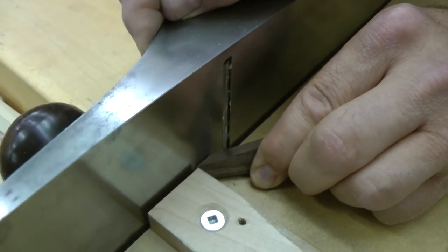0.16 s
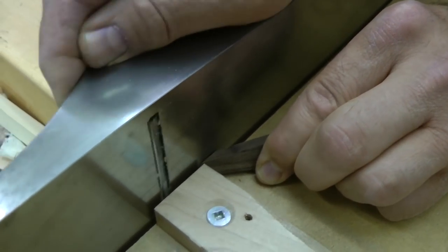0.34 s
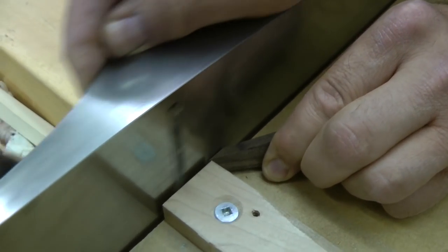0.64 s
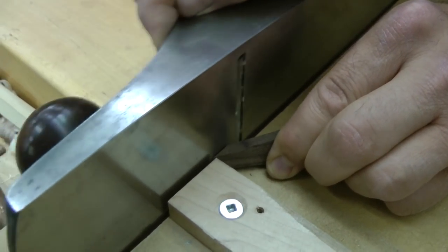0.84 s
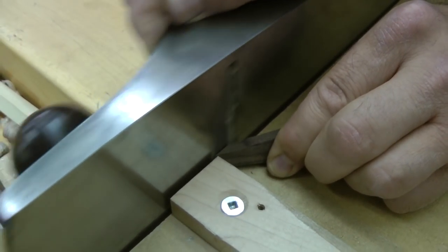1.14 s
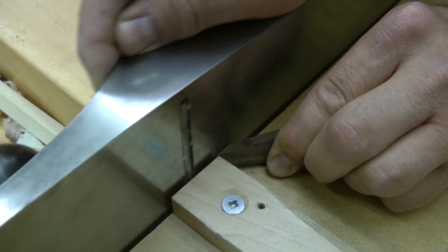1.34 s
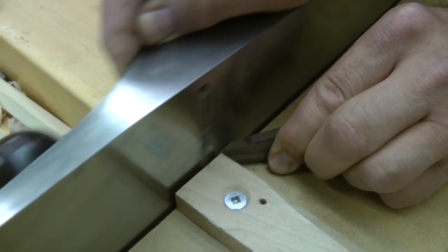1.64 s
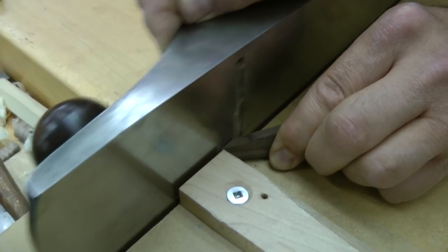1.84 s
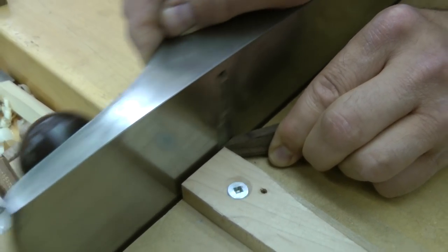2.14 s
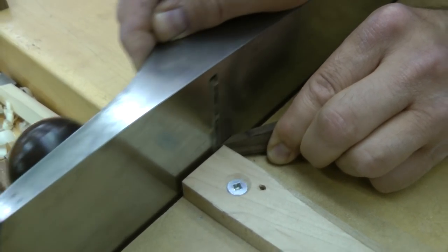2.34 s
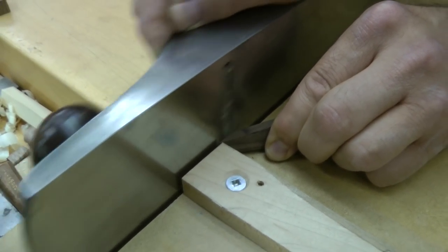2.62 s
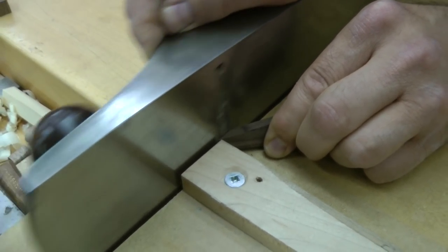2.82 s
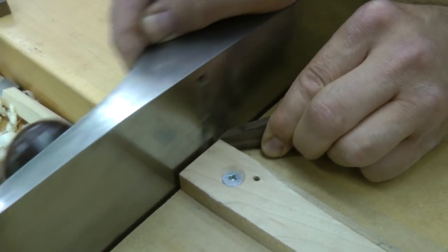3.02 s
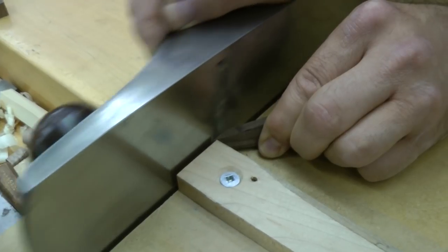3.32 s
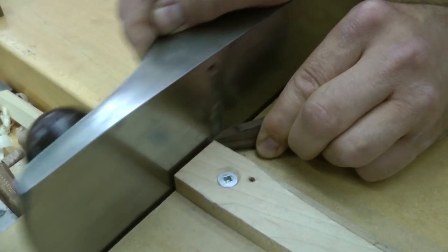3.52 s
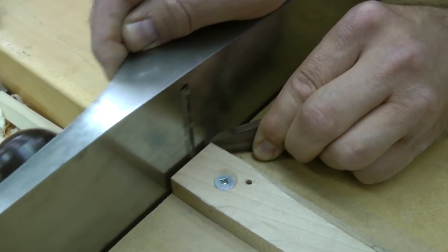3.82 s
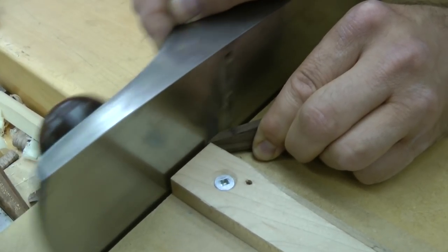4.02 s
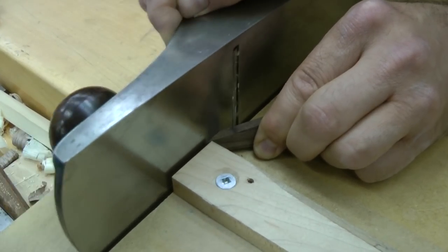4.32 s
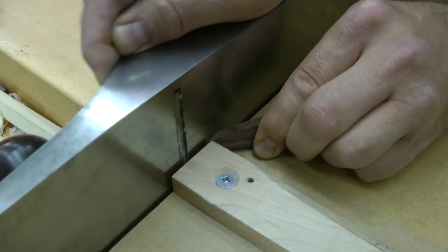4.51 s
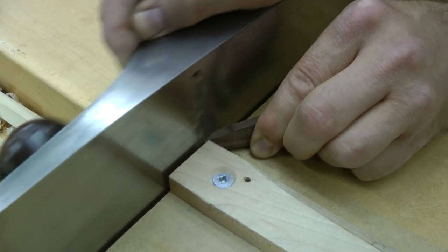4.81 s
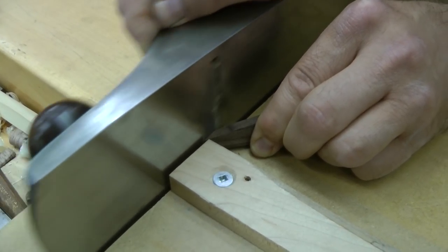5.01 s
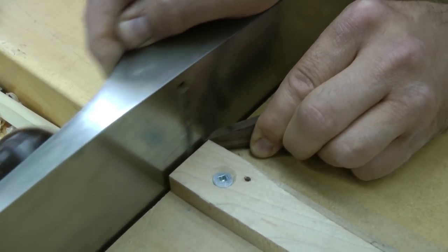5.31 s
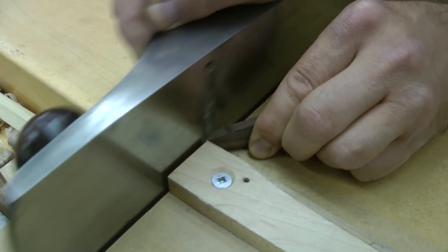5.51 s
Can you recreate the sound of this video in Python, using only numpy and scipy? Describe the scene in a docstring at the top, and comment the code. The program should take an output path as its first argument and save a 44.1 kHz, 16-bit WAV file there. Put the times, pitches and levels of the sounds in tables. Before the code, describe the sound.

A metal hand plane shuttles rapidly on a wooden board, each forward stroke giving a crisp short rasp of cut wood, with soft knocks at the turns.

```python
"""In a small, dry workshop a metal hand plane shuttles on a wooden shooting board, nearly three strokes a second.
Going forward, the blade fractures wood fibres: shaped noise gives the hiss, and drives modes of iron and board;
the board thumps as the blade comes free. The sliding side rubs with a friction noise that follows its speed.
Each turn knocks softly, a push ringing the body's modes; going back, the blade brushes the wood and slips off.
The sound is close and is followed by a short, dull tail, over faint room noise."""
import sys
import numpy as np
from scipy import signal
from scipy.fft import rfft, irfft
from scipy.io import wavfile
from scipy.ndimage import uniform_filter1d

SR = 44100
rng = np.random.default_rng(int(sys.argv[2]) if len(sys.argv) > 2 else 0)


def wav_out(sig):
    """Save sig, one row per channel (or a flat mono array), as 16-bit PCM at SR to the path in sys.argv[1]."""
    wavfile.write(sys.argv[1], SR, np.round(np.clip(np.atleast_2d(sig).T, -1, 1) * 32767).astype(np.int16))


N = 249385
T = np.arange(N) / SR


def amp(db):
    """Level law: decibels to an amplitude ratio."""
    return 10 ** (np.asarray(db) / 20)


def noise():
    """White noise: equal power at every frequency."""
    return rng.standard_normal(N)


def butter_filter(x, order, hz, kind="low"):
    """Linear filtering: a Butterworth filter along time."""
    return signal.sosfilt(signal.butter(order, hz, kind, fs=SR, output="sos"), x)


def through(x, response):
    """Convolution: a linear body answers a force with its impulse response."""
    return signal.oaconvolve(x, response)[:len(x)]


def unit(response):
    """Energy normalisation: white noise passes at its own level."""
    return response / np.sqrt(np.sum(response ** 2))


def add(track, start_s, sound):
    """Superposition: mix a sound into a track at a given time."""
    i = int(start_s * SR)
    sound = sound[max(-i, 0):N - i]
    track[max(i, 0):max(i, 0) + len(sound)] += sound


def along(curve, s):
    """Linear interpolation: the values of a control curve at given times."""
    times, *columns = np.transpose(curve)
    return [np.interp(s, times, column) for column in columns]


def colour(points, size=4096):
    """Minimum phase: a causal response with a given spectrum, falling away below its first point."""
    hz, db = np.transpose(points)
    f = np.arange(size // 2 + 1) * SR / size + 1
    low_fall = np.clip(f / hz[0], 1 / 10, 1) ** 2
    gain = amp(np.interp(np.log(f), np.log(hz), db)) * low_fall
    # folding the cepstrum on to positive times makes the response causal
    cepstrum = irfft(np.log(gain))[:size // 2]
    return unit(irfft(np.exp(2 * rfft(cepstrum, size))))


def ringing(modes, size=6000):
    """Modal superposition: damped modes of a body that radiates little outside their range."""
    t = T[:size]
    ring = np.zeros(size)
    for hz, width_hz, db in modes:
        decay = np.exp(-np.pi * width_hz * t)
        # the factor of width makes the level that of the spectral peak
        ring += amp(db) * width_hz * decay * np.cos(2 * np.pi * hz * t)
    ring = butter_filter(ring, 4, modes[0][0] * 0.95, "high")
    return unit(butter_filter(ring, 8, modes[-1][0] * 1.012))


def grit(rate, spread_db, flicker_rate, flicker_db, size=400):
    """Random impulses: clustered uneven fractures, divided by their local rms to hold an even level."""
    happens = rng.random(N) < rate / SR  # rate in fractures per second
    clicks = happens * noise() * amp(spread_db * noise())
    clusters = np.interp(T * flicker_rate, np.arange(N), noise())
    x = clicks * amp(flicker_db * clusters)
    return x / np.sqrt(uniform_filter1d(x ** 2, size) + 1e-9)


def contact(start, end, db, change_db, rise_s, fall_s):
    """Contact force: it builds while the surfaces touch, drifts about its level and then dies away."""
    t = T[:int(.12 * SR)]
    length = end - start
    drift = amp(db + change_db * (np.minimum(t / length, 1) - .5))
    rise = np.minimum(t / rise_s, 1)
    release = np.exp(-np.maximum(t - length, 0) / fall_s)
    return drift * rise * release


def blow(response, db, push_s):
    """Impulsive excitation: a soft, uneven push rings a body up to a peak level."""
    t = T[:len(response)] / push_s
    push = t * np.exp(-t) * rng.standard_normal(len(t))
    sound = through(push, response)
    return amp(db) * sound / np.abs(sound).max()


def singing(force, hz, width_hz=130):
    """Resonance as narrow-band noise: a force locks on to one mode and wavers."""
    waver = butter_filter(rng.standard_normal((2, len(force))), 2, width_hz / 2)
    ring = (waver[0] + 1j * waver[1]) * np.exp(2j * np.pi * hz * T[:len(force)])
    return force * ring.real / np.std(ring.real)


# modes of board and bench: mode_hz, width_hz, relative_level_db
BOARD_MODES = [(289, 12, -25.5), (309, 120, -20), (404.3, 38, -3.5), (440.7, 42, -1.5), (546.5, 33.4, 3.5),
               (573, 13.3, 2), (667, 36, -17.5), (781, 75, -5.5)]


def board_response():
    """Modal response: the board rings in its own damped modes."""
    return ringing(BOARD_MODES)


# modes of the plane's body and iron: mode_hz, width_hz, relative_level_db
IRON_MODES = [(1113, 60, -2.5), (1326, 13, 4), (1446, 45, 8.5), (1850, 60, -5), (1806, 83, 4),
              (1962, 59, 3.5), (2102, 135, 9), (2294, 66, 2.5), (2498, 173, 3), (2762, 77, 11),
              (2900, 94, -1), (3210, 290, 4.5), (3740, 480, -14.5)]


def iron_response():
    """Modal response: the metal plane rings in its own damped modes."""
    return ringing(IRON_MODES)


# room noise spectrum: frequency_hz, relative_level_db
ROOM_SPECTRUM = [(25, -18), (70, -12), (150, -12), (300, 9.5), (560, -3), (900, -11), (2000, -9.5),
                 (4500, -13.5), (8000, -30), (9900, -16.5), (13000, -23), (16000, -23)]


def room_noise(level_db=-54.5):
    """Stationary noise: a steady random sound with the room's spectrum."""
    return amp(level_db) * through(noise(), colour(ROOM_SPECTRUM))


# forward cuts: start_s, length_s, hiss_level_db (mid-cut), hiss_fall_db (over the cut),
# iron_pitch_hz, thump_peak_db (on coming free)
CUTS = [(-0.03, .031, -14.5, 9, 2160, -15.5), (0.32, .020, -18.5, 14, 2760, -32),
        (0.651, .024, -17.5, 6, 2750, -29), (0.991, .024, -17, -2, 2750, -24.5),
        (1.332, .027, -18.5, -2, 2770, -23.5), (1.664, .030, -18, 4, 2730, -25),
        (2.009, .039, -20.5, 7, 2780, -26), (2.352, .048, -22.8, 3, 2770, -17),
        (2.713, .036, -20.5, 6, 2750, -24), (3.067, .033, -16.5, 5, 2750, -9),
        (3.414, .033, -19, 5, 2020, -11), (3.766, .036, -20.5, 6.5, 1830, -20),
        (4.139, .027, -18.3, 9, 2140, -31), (4.492, .028, -18.7, 2.5, 2060, -23.5),
        (4.837, .038, -20, 11, 2070, -30), (5.206, .031, -18.5, 7, 2030, -30),
        (5.576, .034, -18.5, 6, 2180, -36)]
# drifting tone of the cuts: time_s, chatter_level_db, top_treble_db (re hiss), singing_db (re chatter)
CUT_TONE = [(0.3, -27.6, -8, -0.5), (1.3, -27.8, -9.5, -5.5), (2.4, -25.5, -3, -4), (3.1, -24, -7.5, -11),
            (4.15, -25.3, 2.5, -4), (5.2, -25.5, -1.5, -0.5), (5.6, -27, -1, -6)]
# sharp snaps in the cuts, and one click as the returning blade slips off: time_s, peak_level_db
SNAPS = [(0.3283, -7), (0.66, -9), (1.336, -4), (2.2492, -18), (3.0843, -5), (3.772, -8), (4.1475, -9),
         (4.4965, -6), (4.51, -11), (5.2125, -10)]
# spectrum of breaking fibres: frequency_hz, relative_level_db
FIBRE_SPECTRUM = [(1500, -28), (3600, -73), (4400, -79), (4730, -9.5), (5000, -19.5), (6200, -16.5),
                  (7250, -11.5), (8400, -20), (9750, 0.5), (11000, -10.5), (12200, -9), (13500, -17),
                  (14600, -12.5), (16000, -10.5)]
# the loose piece of wood against its fence: mode_hz, width_hz, relative_level_db
PIECE_MODES = [(404, 53, 5), (438, 100, -2), (1100, 230, -23.5), (1400, 120, -11)]
# low flexing of the bench: mode_hz, width_hz, relative_level_db
BENCH_MODES = [(194, 51, -19), (279, 17, 7), (326.5, 21, 12)]
# a cut of the usual length shakes the board at this level; a quicker one harder in step with its speed
SHAKE_DB, USUAL_CUT_S = -28.3, .031
# the hiss of a usual cut builds up in this time; a slow cut eases into the wood
ENTRY_S, ENTRY_POWER = .003, 1.8
# the board springs back just after the blade comes free
THUMP_LAG_S = .0052
# the bench flexes with it, more after a hard thump and a long push
FLEX_DB, FLEX_PER_THUMP_DB, FLEX_DB_PER_S = -37.5, .45, 400


def cutting(board, iron, chatter_change_db=0.3, shake_change_db=0.6, piece_db=-3, board_sing_db=-0.6):
    """Fracture excitation: breaking fibres hiss, chatter the iron and shake the board, which thumps on release."""
    hiss, top, chatter, shake, rings = np.zeros((5, N))
    crisp, bench = colour(FIBRE_SPECTRUM), ringing(BENCH_MODES)
    board_and_piece = board + amp(piece_db) * ringing(PIECE_MODES)
    for start, length, hiss_db, fall_db, sing_hz, thump_db in CUTS:
        end = start + length
        chatter_db, top_db, sing_db = along(CUT_TONE, start)
        entry_s = ENTRY_S * (length / USUAL_CUT_S) ** ENTRY_POWER
        tear = contact(start, end, hiss_db, -fall_db, entry_s, fall_s=.0016)
        bite = contact(start, end, chatter_db, chatter_change_db, rise_s=0.0071, fall_s=0.0042)
        usual_push = contact(start, end, SHAKE_DB, shake_change_db, rise_s=0.0015, fall_s=.002)
        push = USUAL_CUT_S / length * usual_push
        add(hiss, start, tear)
        add(top, start, amp(top_db) * tear)
        add(chatter, start, bite)
        add(shake, start, push)
        add(rings, start, singing(amp(sing_db) * bite, sing_hz))
        add(rings, start, singing(amp(board_sing_db) * push, hz=564.1, width_hz=80))
        flex_db = FLEX_DB + FLEX_PER_THUMP_DB * thump_db + FLEX_DB_PER_S * length
        # the thump's push sets in 2 ms ahead of the flexing
        add(rings, end + THUMP_LAG_S - .002, blow(board_and_piece, thump_db, push_s=0.0028))
        add(rings, end + THUMP_LAG_S, blow(bench, flex_db, push_s=0.0017))
    for s, peak_db in SNAPS:
        add(rings, s, blow(crisp, peak_db, push_s=.0005))
    fibres = grit(rate=24000, spread_db=2.8, flicker_rate=600, flicker_db=0.3)
    # the very top of the hiss has its own level
    tearing = butter_filter(hiss * fibres, 4, 11200) + butter_filter(top * fibres, 4, 11200, "high")
    # the quick tearing drives the board's upper modes harder than its lower ones
    shaking = butter_filter(shake * fibres, 2, 400, "high")
    return through(tearing, crisp) + through(chatter * fibres, iron) + through(shaking, board) + rings


# the plane turns round at each end of the board: far_end_s, near_end_s
TURNS = [(0.073, 0.242), (0.415, 0.586), (0.756, 0.927), (1.093, 1.267), (1.435, 1.602), (1.774, 1.949),
         (2.126, 2.296), (2.472, 2.649), (2.822, 3.0), (3.173, 3.348), (3.522, 3.697), (3.882, 4.071),
         (4.242, 4.425), (4.599, 4.778), (4.956, 5.143), (5.322, 5.514)]
# weight of the hand, which drives both rubbing and knocks: time_s, relative_level_db
PRESSURE = [(0.1, 1), (0.6, 2.3), (1.8, 0.2), (2.4, -3), (3.0, -0.5), (3.8, -0.7), (4.15, 1.8), (4.8, -1.3),
            (5.5, -0.5)]
# spectrum of the rubbing: frequency_hz, relative_level_db
RUB_SPECTRUM = [(800, -86), (2500, -30), (3300, -19.5), (4300, -5.5), (4800, -5.5), (6500, -7),
                (8400, -7.5), (9600, 6.5), (11400, 0.5), (13000, -8), (16000, -9.5)]
# high, longer ringing modes of the steel: mode_hz, width_hz, relative_level_db
STEEL_MODES = [(4690, 40, -4), (4790, 25, 0)]
# friction level when the pressure curve is at 0 dB
RUB_DB = -41.6


def rubbing(board, iron, lag_s=0.0099, speed_power=1.47):
    """Sliding friction: the noise follows the hand's weight and the speed, which is zero at each turn."""
    s = np.ravel(TURNS)
    half_stroke = np.mean(np.diff(s))
    turns = np.r_[s[0] - half_stroke, s, s[-1] + half_stroke] + lag_s
    phase = np.interp(T, turns, np.arange(len(turns)))
    speed = np.abs(np.sin(np.pi * phase))
    pressure = amp(RUB_DB + along(PRESSURE, T)[0])
    friction = pressure * grit(rate=14000, spread_db=2.5, flicker_rate=300, flicker_db=1.5)
    fast = friction * speed ** speed_power
    metal = amp(-4) * through(fast, iron) + amp(-23) * through(fast, ringing(STEEL_MODES))
    # a lower power of speed: the board rumbles even while the plane moves slowly
    rumble = amp(-6.0) * through(friction * speed ** 0.83, board)
    return through(fast, colour(RUB_SPECTRUM)) + metal + rumble


# force spectrum of the low thud: frequency_hz, relative_level_db
THUD_SPECTRUM = [(100, -18), (270, 2.5), (340, 0.5), (450, -8.5), (600, -24), (2000, -20.5)]
# force spectrum of the lighter tap: frequency_hz, relative_level_db
TAP_SPECTRUM = [(200, -31), (400, -2.5), (600, 5.5), (800, -8.5), (1250, 7.5), (1600, -19), (2200, -11.5),
                (4000, -36)]
# levels at 0 dB pressure (far end, near end): heel thud peak, heel tap peak, settling shudder
THUD_DB, TAP_DB, SETTLE_DB = (-29.9, -29.1), (-35.8, -30.8), (-43, -46)
KNOCK_PER_PRESSURE_DB = .75
# after the knock the plane settles with a brief low shudder
SETTLE_HZ, SETTLE_LAG_S, SETTLE_S = 290, .009, .019


def knocking(board, iron, rock_s=0.00595):
    """Impact excitation: the heavy plane rocks from heel to toe at each turn, then settles with a shudder."""
    thuds, taps, bumps = np.zeros((3, N))
    thud = through(board, colour(THUD_SPECTRUM))
    thud = thud / np.abs(thud).max()
    tap = through(board + amp(-3.5) * iron, colour(TAP_SPECTRUM))
    tap = tap / np.abs(tap).max()
    rock_times = rock_s * (1 + 0.096 * rng.standard_normal((len(TURNS), 2)))
    for stroke, rocks in zip(TURNS, rock_times):
        for heel, thud_db, tap_db, settle_db, rock in zip(stroke, THUD_DB, TAP_DB, SETTLE_DB, rocks):
            weight = amp(KNOCK_PER_PRESSURE_DB * along(PRESSURE, heel)[0])
            toe = heel + rock
            add(taps, heel, weight * amp(tap_db) * tap)
            add(taps, toe, weight * amp(tap_db - 7.5) * tap)
            add(thuds, heel, weight * amp(thud_db) * thud)
            add(thuds, toe, weight * amp(thud_db - 5.5) * thud)
            settling = contact(0, SETTLE_S, settle_db, -3, rise_s=.005, fall_s=.006)
            add(bumps, heel + SETTLE_LAG_S, weight * singing(settling, SETTLE_HZ, width_hz=70))
    # the settling shudder has little sound below about 225 Hz
    return thuds + taps + butter_filter(bumps, 4, 225, "high")


# the blade brushes the wood on the way back: slip_off_s, level_db (mid-brush)
DRAGS = [(0.183, -34), (0.537, -35), (0.877, -33.5), (1.212, -31.5), (1.553, -33.5), (1.904, -33.5),
         (2.251, -34), (2.594, -37), (2.941, -35), (3.295, -32.5), (3.642, -36), (4.01, -34.5), (4.37, -33),
         (4.727, -35.5), (5.09, -37), (5.458, -37)]
# spectrum of the brushing: frequency_hz, relative_level_db
DRAG_SPECTRUM = [(800, -10.5), (2500, 3.5), (3400, -11), (4300, -10), (5300, 1), (5900, -4), (6500, -12.5),
                 (8400, -8.5), (9800, 6), (11500, -4), (13000, -12), (16000, -31)]
# the brushing lengthens over the first strokes and then stays the same
DRAG_FIRST_S, DRAG_GROWTH_S_PER_S, DRAG_LONGEST_S = .019, .0065, .0335


def dragging(board, iron):
    """Friction and release: the back of the blade presses harder and harder on the wood, then slips off its edge."""
    force, slips = np.zeros((2, N))
    for end, db in DRAGS:
        start = end - min(DRAG_FIRST_S + DRAG_GROWTH_S_PER_S * end, DRAG_LONGEST_S)
        add(force, start, contact(start, end, db, 3, rise_s=.008, fall_s=.0025))
        add(slips, end - .002, blow(iron + amp(1.5) * board, db + 9.5, push_s=0.0002))
    scrape = force * grit(rate=22000, spread_db=-0.5, flicker_rate=300, flicker_db=0.1)
    bodies = amp(-8.5) * through(scrape, iron) + amp(-8) * through(scrape, board)
    return through(scrape, colour(DRAG_SPECTRUM)) + bodies + slips


def workshop(x, t60_s=0.3, wet_db=-24, dull_hz=900):
    """Reverberation: a short, exponentially decaying tail from bench and walls; mostly the lows come back."""
    t = T[:SR // 2]
    decay = np.exp(-np.log(1000) * t / t60_s)
    tail = rng.standard_normal(len(t)) * decay * (t > .008)  # reflections start after 8 ms
    tail = butter_filter(tail, 1, dull_hz)
    return x + amp(wet_db) * through(x, unit(tail))


def scene():
    """Superposition: the plane at work over faint room noise."""
    board, iron = board_response(), iron_response()
    work = cutting(board, iron) + rubbing(board, iron) + knocking(board, iron) + dragging(board, iron)
    # a reflection off the bench cancels a narrow band near 925 Hz
    work = signal.lfilter(*signal.iirnotch(925, 4.5, fs=SR), work)
    return (workshop(work) + room_noise())[None]


def record(dry, top_hz=15850):
    """Band limiting: a small microphone with thin bass and a steep top edge."""
    thin = butter_filter(dry, 1, 110, "high")
    return signal.sosfilt(signal.ellip(10, .2, 70, top_hz, fs=SR, output="sos"), thin)


dry = scene()
out = record(dry)
wav_out(out)
```